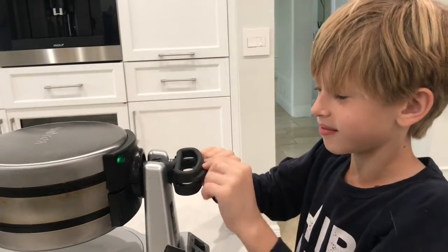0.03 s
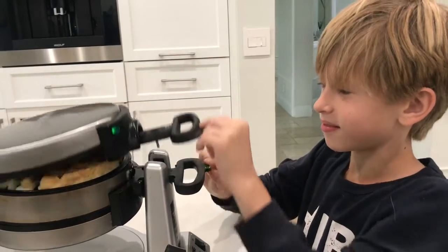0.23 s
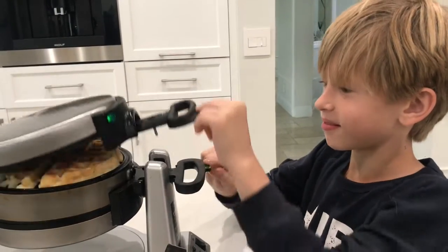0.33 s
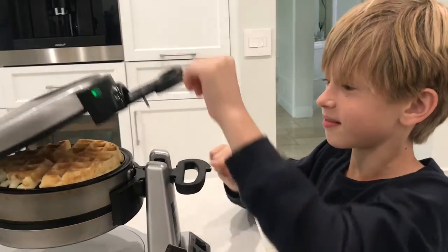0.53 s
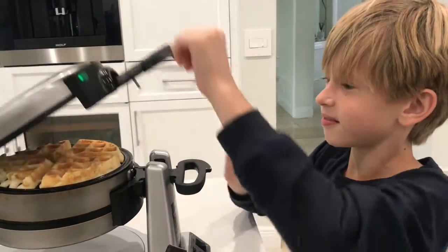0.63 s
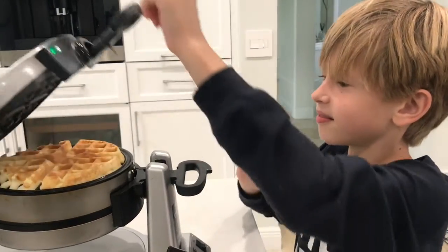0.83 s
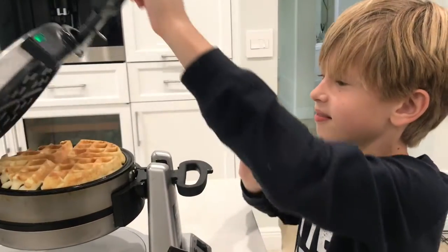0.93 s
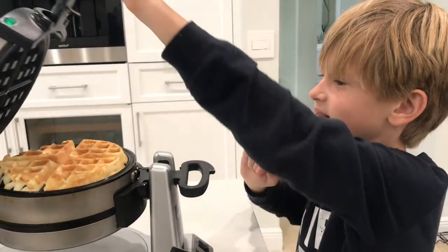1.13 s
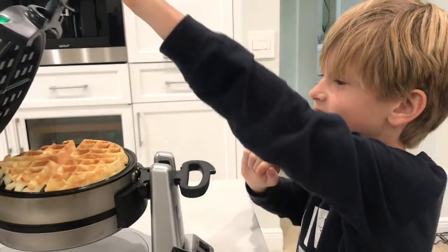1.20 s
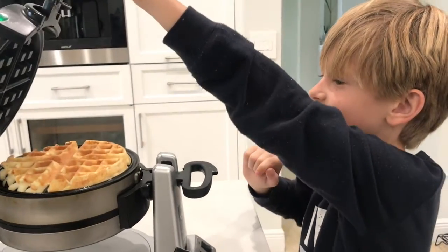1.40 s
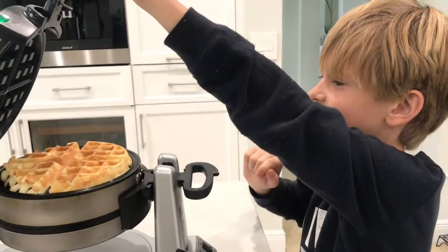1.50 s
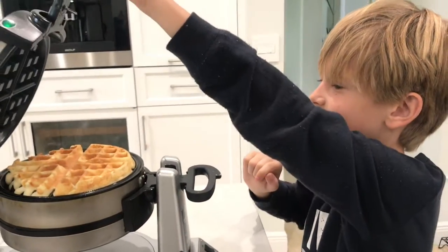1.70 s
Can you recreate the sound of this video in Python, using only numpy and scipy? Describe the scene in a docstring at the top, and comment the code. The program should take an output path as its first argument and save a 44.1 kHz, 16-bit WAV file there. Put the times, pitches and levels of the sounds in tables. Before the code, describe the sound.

A waffle maker lid is opened close to the microphone in a kitchen. The handle knocks softly at the start. At about 0.2 seconds the latch snaps free with a sharp clack and brief metallic rattle, the loudest sound. Another soft knock comes at 0.35 seconds, then two small ringing hinge clicks just before 0.5 seconds. A quiet fan hum and barely audible fizz continue throughout.

```python
"""Opening a waffle maker

A lid is lifted in a kitchen, close to the microphone. The handle knocks softly, the latch snaps free
and rattles the metal shell, then the hinge clicks twice. Each impact is a brief crack plus the free
vibration of damped modes. Counter and cupboards reflect the sound; throughout, a fan hums quietly
and the hot waffle barely fizzes."""
import sys
import numpy as np
from scipy import signal
from scipy.fft import rfft, irfft, next_fast_len
from scipy.io import wavfile
from scipy.ndimage import uniform_filter1d

SR = 44100
rng = np.random.default_rng(int(sys.argv[2]) if len(sys.argv) > 2 else 0)


def unload_audio(sound):
    """Save the sound as a 16-bit wav file, at the path given as the first command line argument."""
    columns = np.transpose(np.atleast_2d(sound))
    # keep every value between -1 and 1, then stretch to whole-number steps
    steps = np.round(np.clip(columns, -1, 1) * 32767)
    wavfile.write(sys.argv[1], SR, steps.astype(np.int16))


N = 77175

# Normal modes of the lid's shell. Each row: frequency in Hz, relative level in dB, T60 in seconds.
SHELL_MODES = [(365.3, 8, 0.14), (490, 2.5, 0.068), (645, 0.5, 0.053), (792, 5.5, 0.033), (890, 5.5, 0.084),
               (1155, -3, 0.12), (1747, -3, 0.045), (2423, -18.5, 0.071), (2690, -25, .06),
               (3170, -5.5, 0.027), (3495, -7, 0.036), (3450, -30, 0.11), (4795, -6, 0.064),
               (5540, -1, .08)]


def undb(db):
    """Amplitude ratio: a factor of ten for every 20 dB."""
    return 10 ** (np.asarray(db) / 20)


def unit(x):
    """Normalisation to unit energy."""
    return x / np.sqrt(np.sum(x ** 2) + 1e-18)


def decay(t60):
    """Exponential damping: the level falls 60 dB in t60 seconds."""
    return np.exp(-np.minimum(np.log(1000) * np.arange(N) / SR / t60, 60))


def delay(x, seconds):
    """Pure time delay, cut to the length of the scene."""
    return np.concatenate([np.zeros(int(seconds * SR)), x])[:N]


def colour(x, points):
    """Minimum-phase filtering through points of frequency in Hz and gain in dB."""
    size = next_fast_len(2 * N)
    hz, db = np.array(points, float).T
    bins_hz = np.maximum(np.fft.rfftfreq(size, 1 / SR), 1)
    gain = undb(np.interp(np.log(bins_hz), np.log(hz), db))
    cepstrum = irfft(np.log(gain), size)
    cepstrum[1:size // 2] *= 2  # folding onto positive time makes the filter causal
    cepstrum[size // 2 + 1:] = 0
    return irfft(rfft(x, size) * np.exp(rfft(cepstrum)), size)[:N]


def band(x, low_hz, high_hz):
    """Band-pass filtering, at least half an octave wide."""
    edges_hz = [min(low_hz, high_hz / np.sqrt(2)), high_hz]
    return signal.sosfilt(signal.butter(2, edges_hz, "band", fs=SR, output="sos"), x)


def burst(t60):
    """Dense modes or echoes add with random phases to decaying noise, here of unit energy."""
    return unit(rng.standard_normal(N) * decay(t60))


def ring(modes, centre_hz, spread_octaves=0.39):
    """Modal superposition: damped sines start from rest, favoured near the blow's centre frequency."""
    t = np.arange(N // 2) / SR
    out = np.zeros(N)
    for hz, db, t60 in modes:
        detuning = np.log2(hz / centre_hz) / spread_octaves
        weight = rng.choice([-1, 1]) * undb(db) / (1 + detuning ** 2)
        out[:len(t)] += weight * unit(np.sin(2 * np.pi * hz * t) * decay(t60)[:len(t)])
    return unit(out)


def crack(t60, contact_db=-8):
    """Impulsive contact: one sharp pulse, then the fast decay of dense modes."""
    out = burst(t60)
    out[0] += undb(contact_db)
    return out


def impacts(blows, spectrum, modes, crack_t60):
    """Impact excitation: the direct sound, and the smoother sum over all directions that fills a room."""
    cracks, pulses, rings = np.zeros((3, N))
    for start, db, low_hz, high_hz, ring_db, centre_hz in blows:
        cracks += undb(db) * delay(unit(band(crack(crack_t60), low_hz, high_hz)), start)
        pulse = unit(band(signal.unit_impulse(N) + 1e-18, low_hz, high_hz))
        pulses += undb(db) * delay(pulse, start)
        rings += undb(ring_db) * delay(ring(modes, centre_hz), start)
    direct = colour(cracks, spectrum) + rings
    radiated = colour(pulses, spectrum) + undb(-2.5) * rings  # part of the ring reaches the walls
    return np.array([direct, radiated])


def fan(air_db=-54, linewidth_hz=3.62):
    """Broadband flow noise plus hum tones, each broadened by a random walk of its phase."""
    # Spectrum of the rushing air. Each row: frequency in Hz, relative spectral density in dB.
    air_spectrum = [(20, -62), (40, -19), (60, -5), (100, -0.5), (140, -7), (185, -5), (215, -14),
                    (300, -6), (365, -12), (400, -16.5), (520, -20.5), (620, -18.5), (800, -20),
                    (1080, -26), (1260, -22.5), (1450, -29.5), (2000, -28.5), (3000, -33.5), (5000, -38.5),
                    (9000, -39), (16000, -41)]
    # Tones of the hum. Each row: frequency in Hz, RMS level in dB.
    hum_tones = [(95, -66), (119, -65), (285, -62.5), (360, -64), (578, -73.5), (1290, -79.5),
                 (1650, -79.5), (1945, -82)]
    t = np.arange(N) / SR
    air = colour(rng.standard_normal(N), air_spectrum)
    out = undb(air_db) * air / air.std()
    for hz, db in hum_tones:
        drift = np.cumsum(rng.standard_normal(N)) * np.sqrt(2 * np.pi * linewidth_hz / SR)
        phase = 2 * np.pi * hz * t + uniform_filter1d(drift, size=900)
        out += undb(db) * np.sqrt(2) * np.sin(phase)
    return out


def sizzle(pops_per_s=140, level_db=-78, spread_db=4.5):
    """Shot noise: tiny, independent pops of the hot waffle merge into a faint fizz."""
    onsets = rng.random(N) < pops_per_s / SR
    strengths = undb(spread_db * np.clip(rng.standard_normal(N), -2, 2))
    envelope = signal.fftconvolve(onsets * strengths, decay(t60=0.0082))[:N]
    fizz = band(envelope * rng.standard_normal(N), low_hz=3000, high_hz=15900)
    return undb(level_db) * fizz / fizz.std()


def knocks():
    """Soft impacts of handle and plates carry little treble and excite mainly the shell's lower modes."""
    # Knocks. Each row: start in seconds, level before colouring in dB, low and high band edges in Hz,
    # ring level in dB, ring centre in Hz.
    blows = [(0.0368, -20.5, 870, 2200, -26.5, 1500), (0.0415, -12.5, 230, 1760, -15, 370),
             (0.0575, -21, 695, 1600, -68, 1100), (0.2350, -25.5, 68.4, 375, -23, 408),
             (0.3430, -20, 586, 1600, -38, 900), (0.3545, -13, 166, 605, -51, 450)]
    # Colour of a knock. Each row: frequency in Hz, gain in dB.
    spectrum = [(100, 6.5), (400, -12.5), (700, -7.5), (1450, -6.5), (2600, -21.5), (4200, -12),
                (8000, -40)]
    return impacts(blows, spectrum, SHELL_MODES, crack_t60=0.039)


def latch(slip_start_s=0.1596, slip_rise_s=0.047, slip_db=-53.5):
    """Sliding friction, then impacts: the catch scrapes, snaps free and rattles against the shell."""
    # Blows of the catch. Each row: start in seconds, crack level before colouring in dB,
    # low and high band edges in Hz, ring level in dB, ring centre in Hz.
    blows = [(0.2095, 1, 2820, 17700, -10.5, 3700), (0.2135, -8, 1780, 9000, -10.5, 676),
             (0.2225, -16, 1500, 9000, -10, 1740), (0.2396, -7, 2100, 5700, -11, 1740),
             (0.2410, -17, 302, 1530, -12.5, 440), (0.2497, -27, 2840, 5200, -61, 3530)]
    # Colours of the scrape and of the crack. Each row: frequency in Hz, gain in dB.
    scrape_spectrum = [(500, -2.5), (2500, -11), (4200, -6), (6000, -13), (16000, -27)]
    crack_spectrum = [(300, 10.5), (2500, 2.5), (4200, 6), (5400, 0.5), (7000, 3.5), (8300, -3.5),
                      (9700, 7), (11000, -0.5), (13500, 2.5), (16000, -3)]
    t = np.arange(N) / SR
    release_s = blows[0][0]
    pressure = np.clip((t - slip_start_s) / slip_rise_s, 0, 1) * (t < release_s)
    friction = colour(rng.standard_normal(N), scrape_spectrum)
    scrape = undb(slip_db) * pressure * friction / friction.std()
    return scrape + impacts(blows, crack_spectrum, SHELL_MODES, crack_t60=0.016)


def hinge():
    """Two clusters of impacts, each heard as one click, set the hinge into free vibration."""
    # Ticks. Each row: start in seconds, level before colouring in dB, low and high band edges in Hz,
    # ring level in dB, ring centre in Hz.
    blows = [(0.4373, -19.5, 4400, 16800, -43, 3700), (0.4390, -29, 1500, 14000, -14, 3700),
             (0.4402, -18, 1560, 2350, -21.5, 2120), (0.4786, -20, 1300, 16300, -22.5, 3900),
             (0.4810, -25.5, 800, 12000, -21.5, 900)]
    # Colour of a tick. Each row: frequency in Hz, gain in dB.
    spectrum = [(500, 5.5), (2000, 7.5), (3800, 1), (6000, 2), (8600, 4.5), (10500, 0), (13000, 4.5),
                (16000, -6)]
    # Normal modes of the hinge. Each row: frequency in Hz, relative level in dB, T60 in seconds.
    modes = [(915, -14, 0.031), (1470, -13, .04), (1712, -21, 0.2), (2057, -2, .26), (2186, 5, 0.1),
             (3730, -14, 0.026), (5440, -12, 0.073)]
    return impacts(blows, spectrum, modes, crack_t60=0.021)


def kitchen(direct, radiated):
    """Convolution adds early reflections and a reverberant tail whose treble dies first."""
    # Colours of the reflections from counter and cupboards and of the reverberation.
    # Each row: frequency in Hz, gain in dB.
    early_spectrum = [(100, -8.5), (500, -5), (1500, -5.5), (4000, -5), (8000, -9.5), (16000, -9)]
    late_spectrum = [(100, -13), (500, -9), (1500, -9), (2600, -13.5), (3700, -10), (4800, -14.5),
                     (6000, -11), (8000, -15.5), (10000, -11.5), (16000, -24.5)]
    early = colour(delay(burst(t60=0.15), seconds=0.005), early_spectrum)
    tail = band(burst(t60=1), 40, 6000) + band(burst(t60=0.38), 6000, 20000)
    late = colour(delay(tail, seconds=0.018), late_spectrum)
    return direct + signal.fftconvolve(radiated, early + late)[:N]


def scene():
    """Superposition of the lid's sounds in the kitchen with the steady fan and fizz."""
    direct, radiated = knocks() + latch() + hinge()
    return (kitchen(direct, radiated) + fan() + sizzle())[None]


def record(dry, dip_hz=10440, dip_depth=0.7, cutoff_hz=16100):
    """Frequency response: the microphone has a narrow treble dip, the recorder a steep low-pass."""
    notched = signal.lfilter(*signal.iirnotch(dip_hz, Q=21, fs=SR), dry)
    heard = dry + dip_depth * (notched - dry)
    return signal.sosfilt(signal.ellip(10, 0.2, 80, cutoff_hz, fs=SR, output="sos"), heard)


dry = scene()
out = record(dry)
unload_audio(out)
```